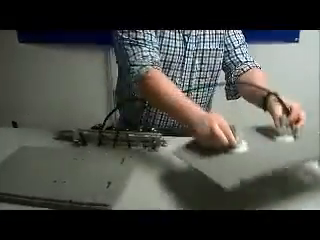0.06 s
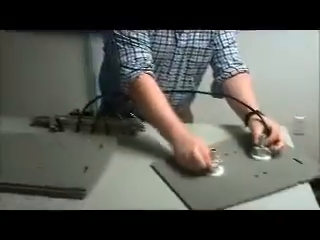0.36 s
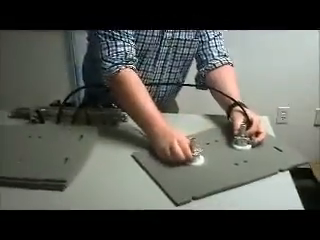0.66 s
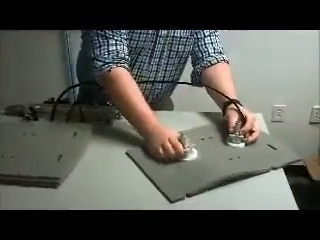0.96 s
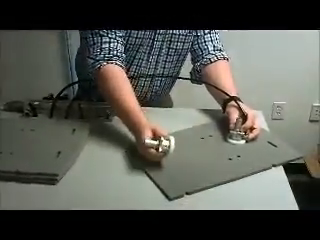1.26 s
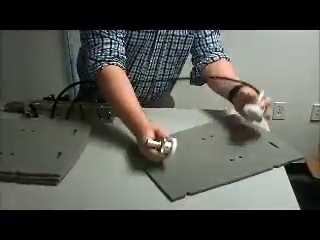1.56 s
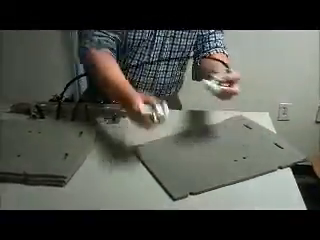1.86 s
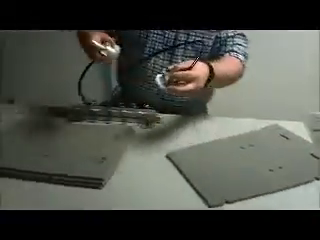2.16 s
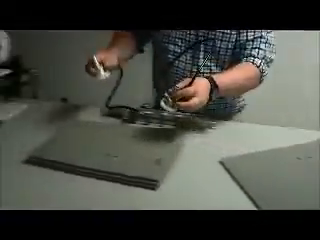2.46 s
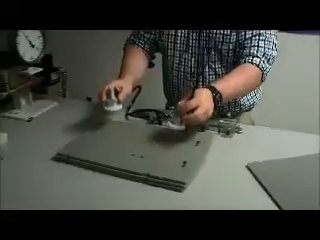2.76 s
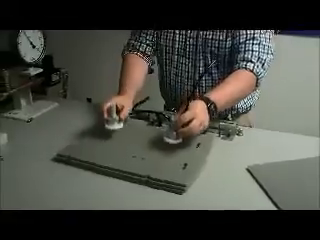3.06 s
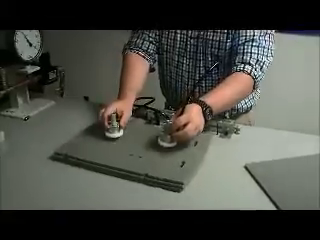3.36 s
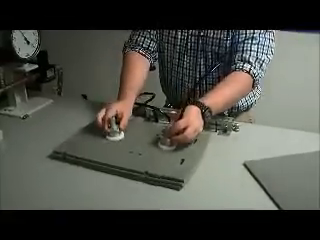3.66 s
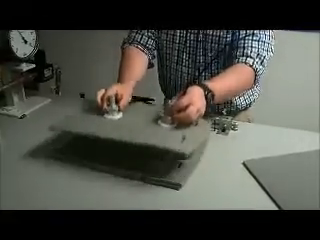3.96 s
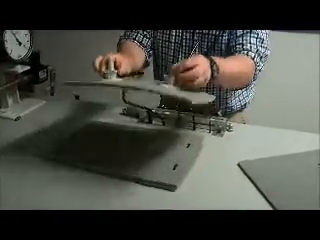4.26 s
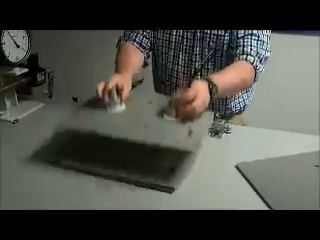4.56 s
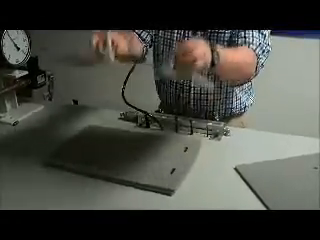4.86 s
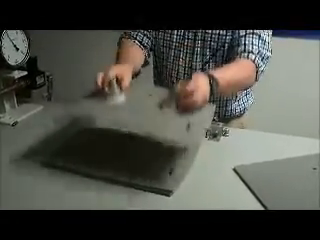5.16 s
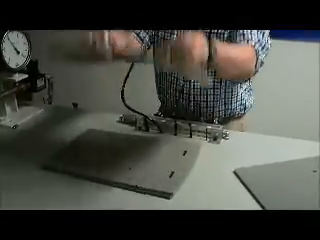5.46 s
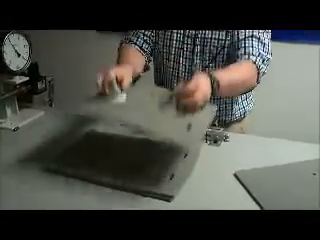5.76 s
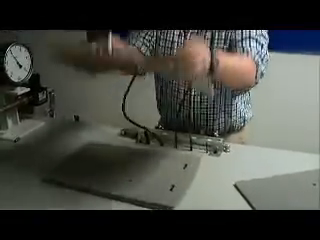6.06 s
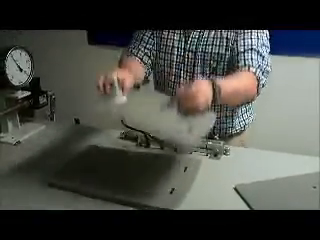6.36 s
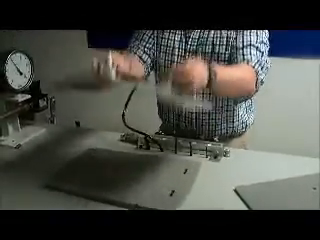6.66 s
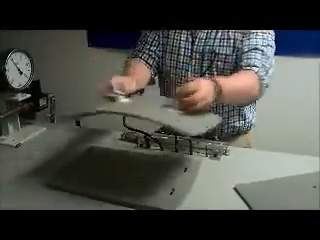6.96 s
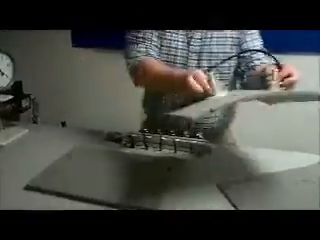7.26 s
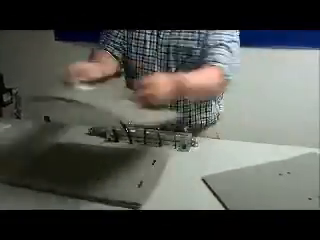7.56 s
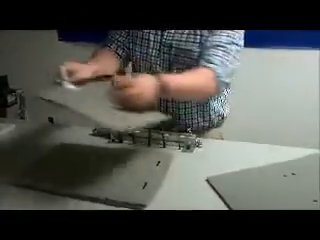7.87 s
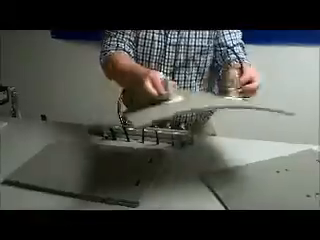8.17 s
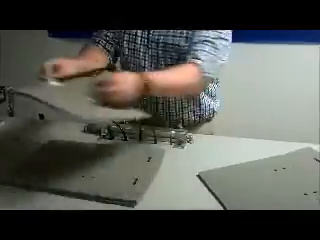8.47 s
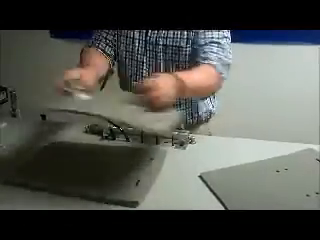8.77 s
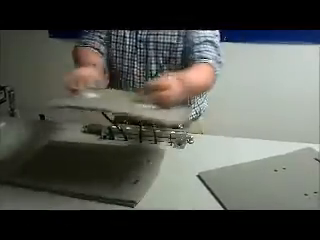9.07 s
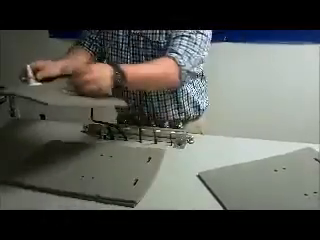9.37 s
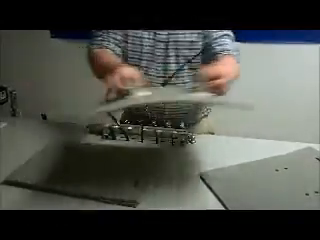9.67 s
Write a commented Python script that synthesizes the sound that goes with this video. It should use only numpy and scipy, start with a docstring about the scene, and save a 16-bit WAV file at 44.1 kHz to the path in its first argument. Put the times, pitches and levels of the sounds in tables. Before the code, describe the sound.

A loud, steady hiss of compressed air from two hand-held suction grippers runs throughout, with a high, whistling ring while the cups are sealed on a foam sheet. At about 1.1 and 1.4 seconds the cups let go: the ring weakens and the hiss becomes a brighter, airier rush. Its tone sweeps slightly as the grippers move above the table. At about 3.7 seconds one cup seals onto another sheet with a short, hollow slurp, and the second follows more softly at 3.9. The ring returns and the brightness eases. From about 4.5 to 9.5 seconds the hiss swells briefly again and again as the foam is swung about, most clearly near 5.5, 6.1, 6.7 and 9.5 seconds. The air keeps flowing to the end, near 10 seconds. The room is small and hard, with short reflections, heard through a little mono camera microphone.

```python
"""Two hand-held suction grippers hiss on compressed air as they set down a foam sheet; while the cups
are sealed, their venturi exhaust rings near 4.6 kHz. At 1.1 and 1.4 s they let go, and the open cups
draw air with a brighter rush. Near 3.7 and 3.9 s they slurp onto another sheet, the ring returns, and
the hiss surges as the foam is swung about. Throughout, the table's echo combs the hiss as the hands
move, in a small hard room heard through a little mono camera's microphone."""
import sys
import numpy as np
from scipy import signal
from scipy.fft import rfft, irfft
from scipy.io import wavfile
from scipy.ndimage import uniform_filter1d

SR = 44100
rng = np.random.default_rng(int(sys.argv[2]) if len(sys.argv) > 2 else 0)


def digitize_waveform(pressure):
    """Quantize a signal to 16-bit integers and store it at the path in sys.argv[1].

    Rows of a 2-D input are taken as channels; values are limited to [-1, 1].
    """
    field = np.atleast_2d(pressure).T
    bounded = np.clip(field, -1, 1)
    quanta = np.round(bounded * 32767).astype(np.int16)
    wavfile.write(sys.argv[1], SR, quanta)


N = 437031
TIME = np.arange(N) / SR
BINS_HZ = np.maximum(np.arange(N // 2 + 1) * SR / N, 1)

# each cup drops one sheet and seizes the next (release [s], seal [s], share of the air [0-1])
CUP_GRIPS = [(1.105, 3.69, .66), (1.382, 3.91, .34)]


def undb(db):
    """Decibels to gain."""
    return 10 ** (np.asarray(db) / 20)


def colour(points):
    """EQ curve through (frequency [Hz], level [dB]) points, 35 dB down beyond the last."""
    hz, db = np.transpose(points)
    return undb(np.interp(np.log(BINS_HZ), np.log(hz), db, left=db[0], right=db[-1] - 35))


def resonance(hz, width_hz):
    """EQ curve of a resonance applied twice, for steep skirts."""
    return 1 / (1 + ((BINS_HZ / hz - hz / BINS_HZ) * hz / width_hz) ** 2)


def equalise(x, eq):
    """Filter by a gain for every frequency."""
    return irfft(rfft(x) * eq, N)


def noise(eq):
    """Coloured noise with rms 1."""
    x = equalise(rng.standard_normal(N), eq)
    return x / x.std()


def wobble(rate_hz):
    """Slewed random sample-and-hold, a modulator with rms near 1.6."""
    hold = max(int(SR / rate_hz), 1)
    steps = np.repeat(rng.standard_normal(N)[:N // hold + 1], hold)
    return 1.92 * uniform_filter1d(steps, hold)[:N]


def swell(at_s, half_length_s):
    """A smooth rise and fall, 1 at its peak."""
    return np.exp(-np.square((TIME - at_s) / half_length_s))


def openness(lag_s=0, seal_s=0.014):
    """Share of the air drawn through cups that are off the foam, 0-1."""
    step = lambda at_s: 0.5 + 0.5 * np.tanh((TIME - at_s) / seal_s)
    return sum(share * (step(release + lag_s) - step(seal)) for release, seal, share in CUP_GRIPS)


def hovering(hover_s=0.36):
    """How near the cups' lips are to lifting or landing, 0-1."""
    return sum(share * (swell(release, hover_s) + swell(seal, hover_s))
               for release, seal, share in CUP_GRIPS)


def rumble(level_db=-65.5, open_db=5.5, waver_db=2.0):
    """A faint, uneven low bed that lifts while the open cups are handled."""
    # tone of the rumble (frequency [Hz], level [dB])
    rumble_eq = [(20, 2), (45, -12), (68, 0.5), (95, -25), (160, -24), (300, -20), (800, -35)]
    return noise(colour(rumble_eq)) * undb(level_db + open_db * openness() + waver_db * wobble(9))


def room(x, t60_s=0.24, wet_db=-8.0, crossfade_s=0.25):
    """Close, hard walls; as the hands move, one pattern of reflections fades into the next."""
    decay = np.exp(-np.log(1000) * TIME[:SR // 2] / t60_s)
    wet = np.zeros(N + len(decay))
    for at_s in np.arange(0, TIME[-1] + crossfade_s, crossfade_s):
        near = np.flatnonzero(abs(TIME - at_s) < crossfade_s)
        fade = np.cos(np.pi / 2 * (TIME[near] - at_s) / crossfade_s)
        tail = rng.standard_normal(len(decay)) * decay
        echoes = signal.fftconvolve(x[near] * fade, tail / np.linalg.norm(tail))
        wet[near[0]:near[0] + len(echoes)] += echoes
    return (x + undb(wet_db) * wet[:N]) / np.hypot(1, undb(wet_db))


def table_comb(jet):
    """The jet plus its bounce off the table or sheet: a comb that sweeps with the hands' height."""
    # the bounce comes later as the hands rise (time [s], delay [ms], strength [0-1])
    bounce = [(0, .68, 0), (.12, 0.69, 0.37), (.25, 0.42, 0.07), (.55, 0.29, 0.3), (.95, 0.31, 0.34),
              (1.3, .24, 0.18), (1.6, 0.27, 0), (1.95, 0.63, .36), (2.2, 0.6, .42), (2.7, 0.6, 0.38),
              (3.3, .57, 0.2), (3.62, .57, .28), (3.7, 1.53, 0.06), (4.3, 2.0, 0.09), (5.3, 1.7, 0),
              (6.1, 2.08, 0.07), (9.91, 1.9, 0.05)]
    times, delays_ms, strengths = np.transpose(bounce)
    delay_s = np.interp(TIME, times, delays_ms) / 1000
    echo = np.interp(TIME - delay_s, TIME, jet)
    return jet + np.interp(TIME, times, strengths) * echo


def lip_slurps(attack_s=0.008):
    """Air squeezes between lip and foam, coloured by the hollow of the cup."""
    # a lip lifts or lands (start [s], length [s], level [dB])
    slurps = [(1.066, .07, -56), (3.624, 0.13, -30), (3.81, 0.14, -40)]
    # resonances of the closing cup (frequency [Hz], width [Hz], level [dB])
    cup_modes = [(196, 34, -13), (487, 23, -1), (640, 110, -3), (2300, 1300, -9), (3640, 700, -5)]
    envelope = 0
    for start_s, length_s, db in slurps:
        age = np.maximum(TIME - start_s, 0)
        envelope += undb(db) * (1 - np.exp(-age / attack_s)) * np.exp(-(age / length_s) ** 4)
    hollow = sum(undb(db) * resonance(hz, width) for hz, width, db in cup_modes)
    return envelope * noise(hollow)


def bore_ring(pitch_hz=4550, width_hz=834, rise_hz_per_s=4, sag_hz=90.06, wander_hz=20, flutter_db=0.18):
    """Noise rings in the exhaust bore; pitch and level waver with the turbulence."""
    pressed = hovering() * (1 - openness())  # a sealed cup pushed onto the foam
    hz = pitch_hz + rise_hz_per_s * TIME - sag_hz * pressed
    shift_hz = hz - hz.mean() + wander_hz * wobble(14)
    band = signal.hilbert(noise(resonance(hz.mean(), width_hz)))
    ring = np.real(band * np.exp(2j * np.pi * np.cumsum(shift_hz) / SR))
    return ring * undb(flutter_db * wobble(45))


def grippers(intake_lag_s=0.06, sway_db=0.46, flutter_db=0.34):
    """Turbulent air through nozzle, bore and cups: sealed cups ring, open ones gulp air and brighten."""
    # the four bands of the air flow, dark to bright (frequency [Hz], level [dB])
    roar_eq = [(60, -53), (160, -20.5), (250, -13.5), (430, -10), (510, -4), (850, 2.5), (1100, -2.5),
               (1500, -10), (2500, -31)]
    exhaust_eq = [(700, -43), (1100, -11.5), (1450, -3), (1750, -2.5), (2150, 3.5), (2600, 0.5),
                  (3200, -4.5), (3800, -5.5), (4500, 3), (6000, -32)]
    intake_eq = [(2400, -31.5), (3200, -3.5), (4200, 2), (5400, 1), (6100, 1.5), (7200, -1), (8200, -22),
                 (10000, -23)]
    spray_eq = [(6000, -25), (7500, 6), (8500, -0.5), (9600, 2), (10400, -0.5), (11600, 1.5), (12500, -12)]
    # foam sweeping past the jets throws the hiss at the microphone
    # (time [s], half length [s], exhaust boost [dB], spray boost [dB])
    swings = [(0.442, .15, 0.6, .8), (.9, 0.18, 0, 0.5), (2.594, 0.2, 2.0, -1), (3.154, .1, 1.5, -1),
              (3.653, 0.081, 3, -0.2), (4.55, .1, 0.3, 3), (4.94, 0.12, 3.4, 3), (5.504, 0.11, 5, 2.3),
              (6.123, 0.15, 4.5, 2.5), (6.707, 0.19, 4, 2), (7.86, 0.19, 2, 2.0), (8.68, 0.16, 2.2, 2.3),
              (9.06, 0.097, 1.3, 1.2), (9.46, 0.092, 2.5, 5)]
    opened, drawing, hover = openness(), openness(intake_lag_s), hovering()
    surge_db = sum(db * swell(at, half) for at, half, db, _ in swings) + sway_db * wobble(5)
    swish_db = sum(db * swell(at, half) for at, half, _, db in swings)
    stall_db = -5 * swell(1.145, 0.035)  # the bore stalls as the first seal breaks
    # each fader in dB: sealed level, then rides for open cups, hovering lips and swings
    roar = noise(colour(roar_eq)) * undb(-46 + 0.18 * opened + 3 * hover + 0.78 * surge_db)
    exhaust = noise(colour(exhaust_eq)) * undb(-32.5 + 0.69 * opened - 0.29 * hover + surge_db)
    ring = bore_ring() * undb(-23 - 6.5 * opened - 0.16 * hover - 0.43 * swish_db + stall_db)
    intake = noise(colour(intake_eq)) * undb(-31.5 + 5.46 * drawing + 1.3 * hover + 0.67 * swish_db)
    spray = noise(colour(spray_eq)) * undb(-35.5 + 3.4 * drawing + 0.61 * hover + swish_db)
    hiss = table_comb(roar + exhaust + ring) + intake + spray
    return hiss * undb(flutter_db * wobble(60))  # large eddies shake the whole flow together


def scene():
    """Hiss in the room, dry slurps and rumble meet at one microphone that feeds both channels."""
    mono = room(grippers()) + lip_slurps() + rumble()
    return np.array([mono, mono])


def record(dry, top_hz=11830):
    """The camera cuts the top like a brick wall and notches four narrow bands."""
    # dead bands in the treble (frequency [Hz], half width [Hz], steepness [exponent])
    notches = [(2716, 116, 1.11), (5488, 196, 1), (7840, 243, 3.22), (10960, 136, 1.53)]
    eq = 1 / np.sqrt(1 + (BINS_HZ / top_hz) ** 900)
    for hz, half_width, steepness in notches:
        dip = 1 / (1 + np.square((BINS_HZ - hz) / half_width))
        eq *= (1 - dip) ** steepness
    return equalise(dry, eq)


dry = scene()
out = record(dry)
digitize_waveform(out)
```